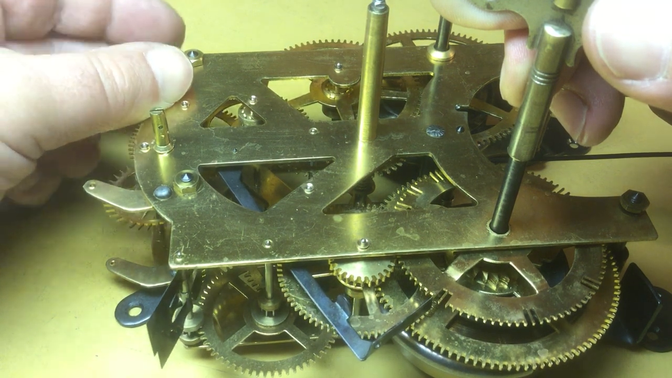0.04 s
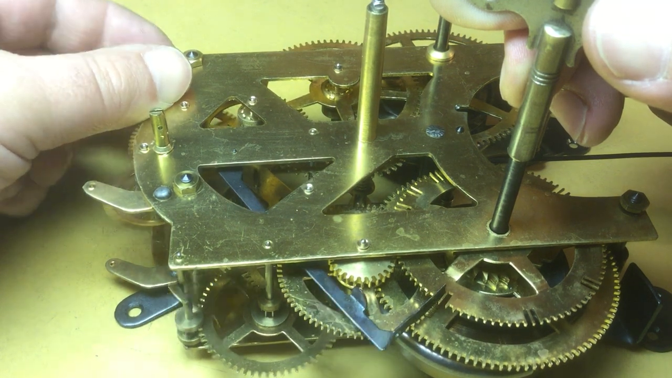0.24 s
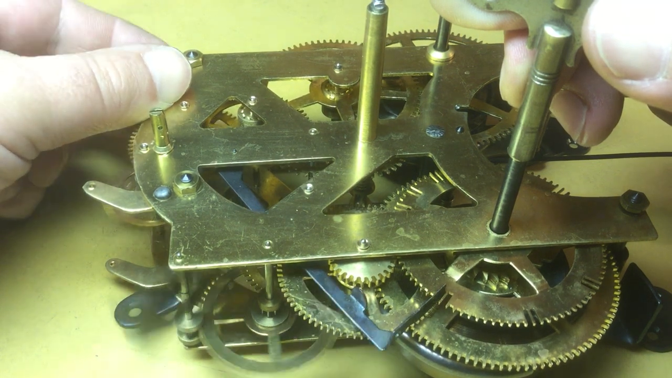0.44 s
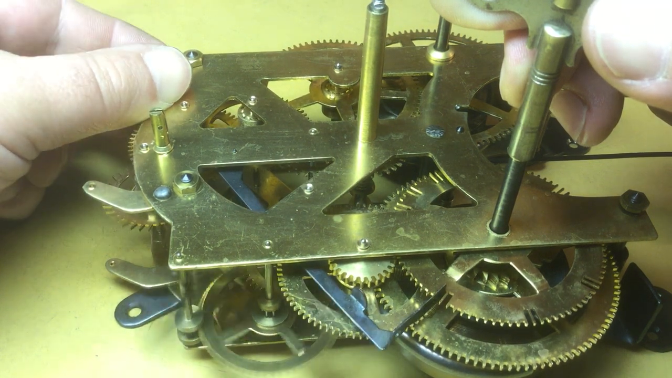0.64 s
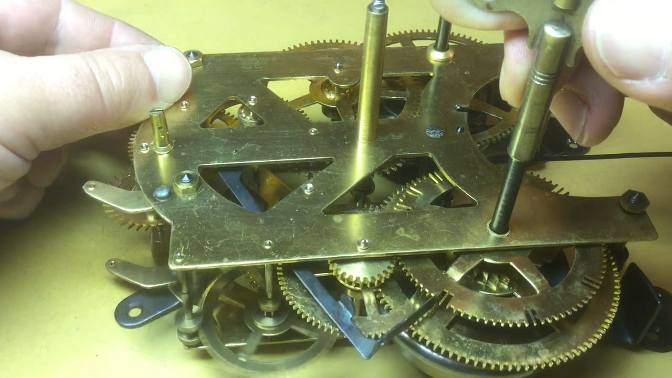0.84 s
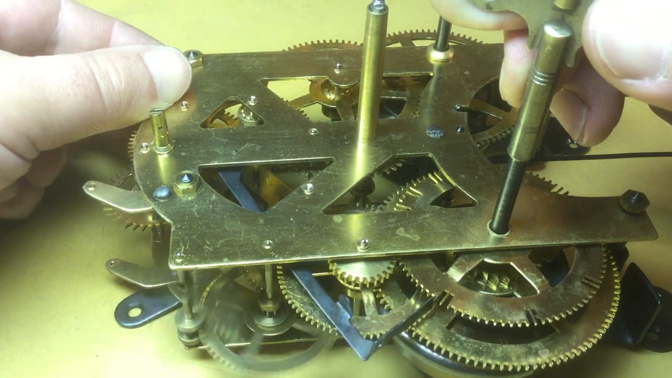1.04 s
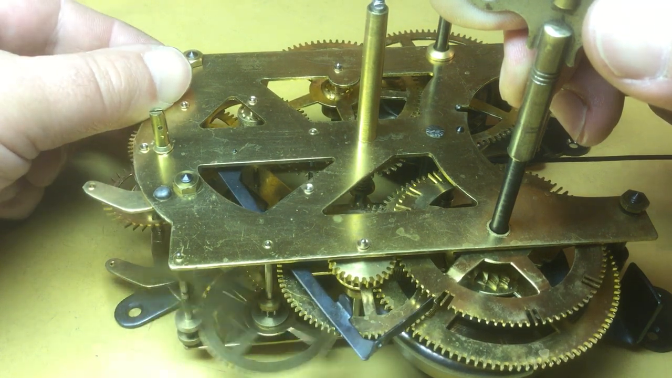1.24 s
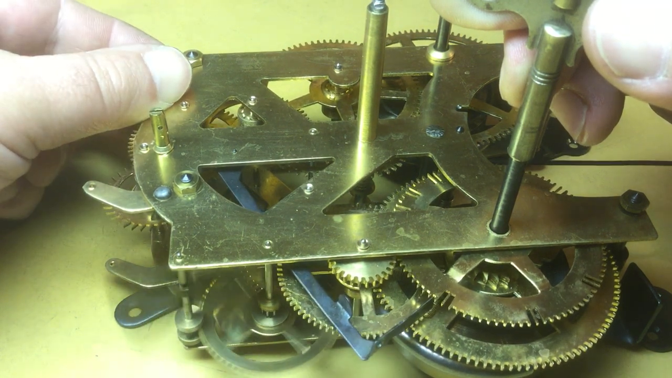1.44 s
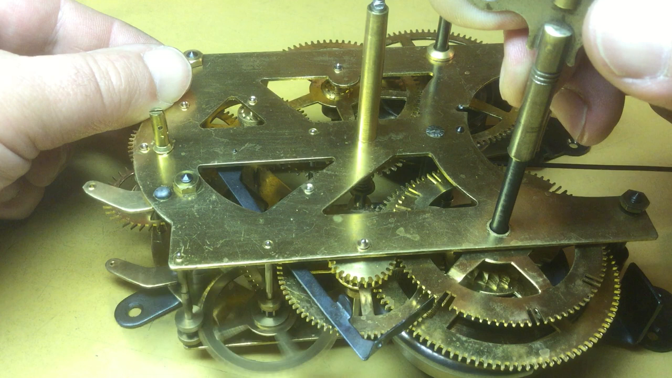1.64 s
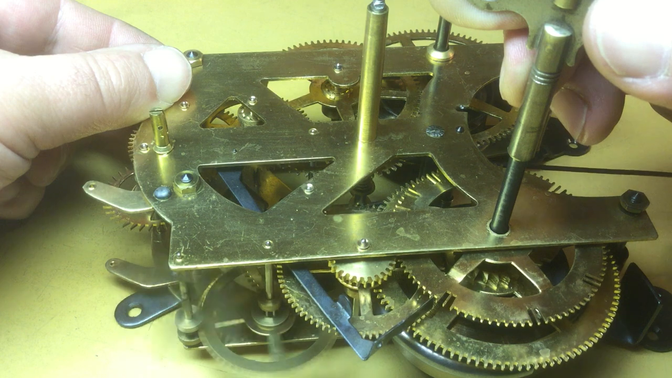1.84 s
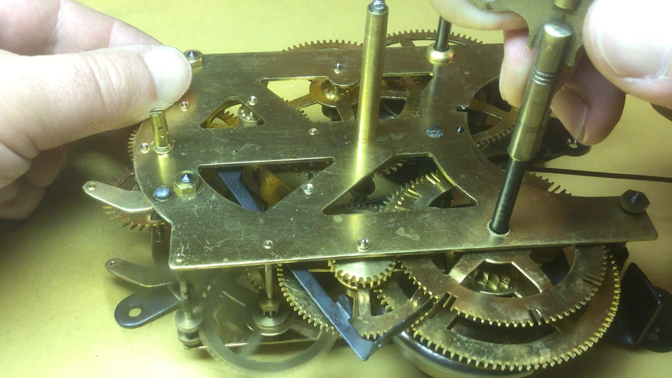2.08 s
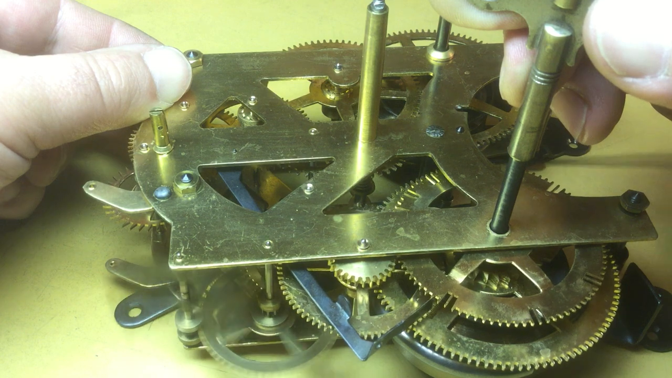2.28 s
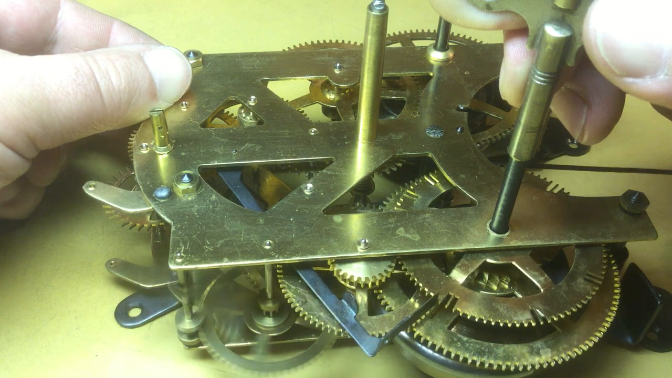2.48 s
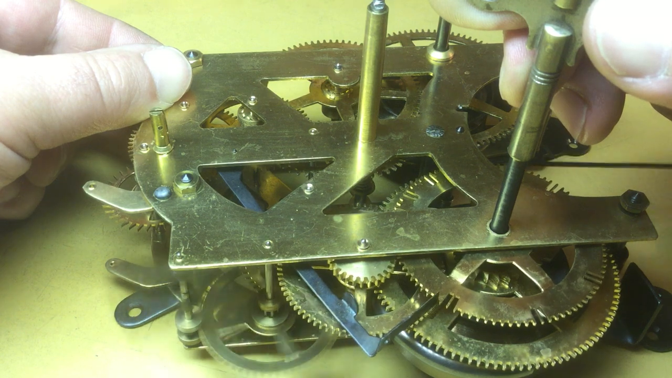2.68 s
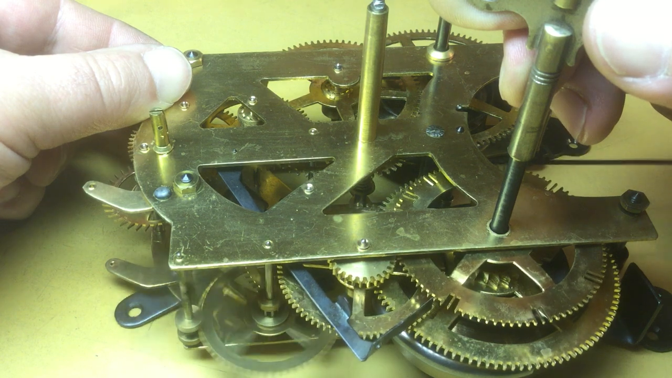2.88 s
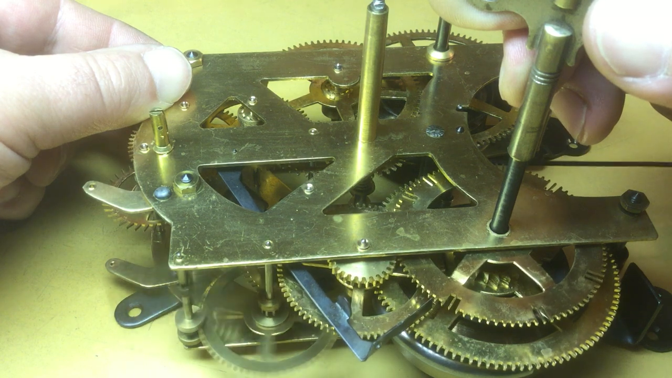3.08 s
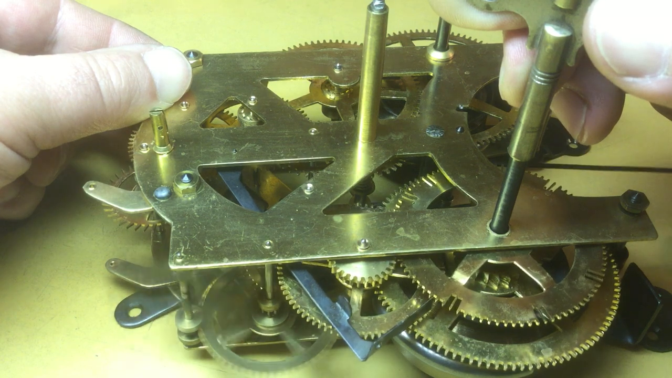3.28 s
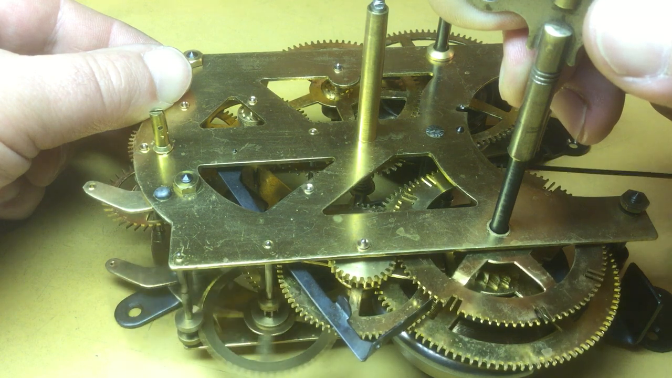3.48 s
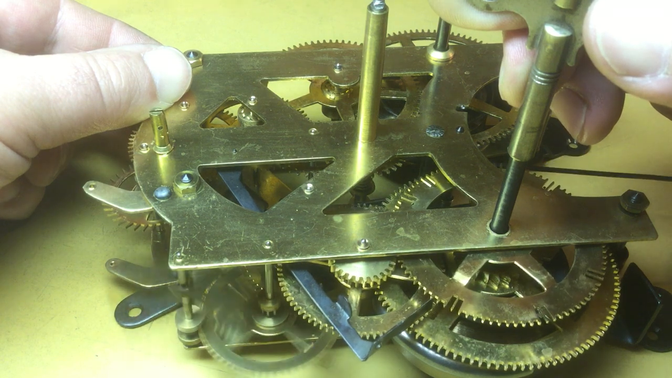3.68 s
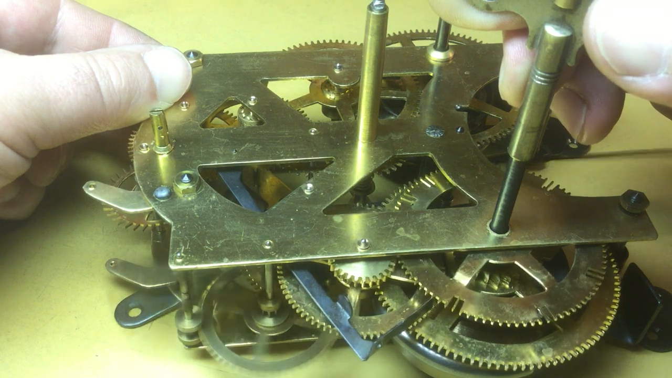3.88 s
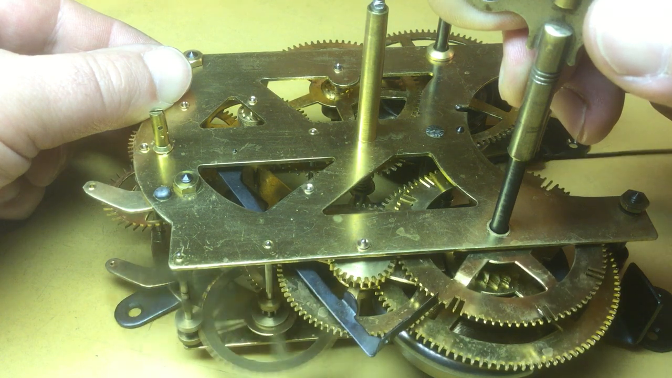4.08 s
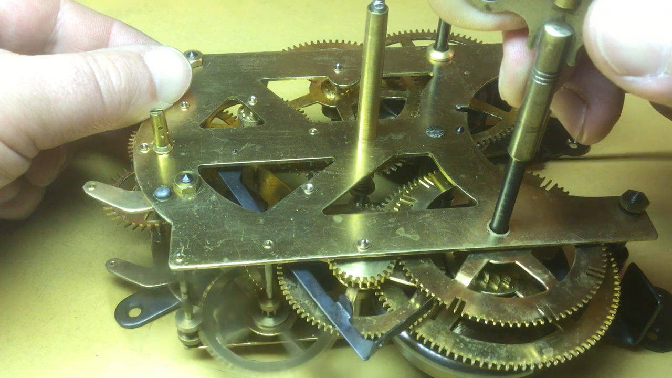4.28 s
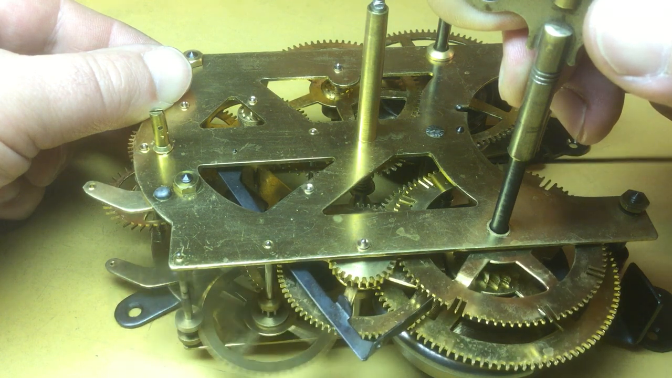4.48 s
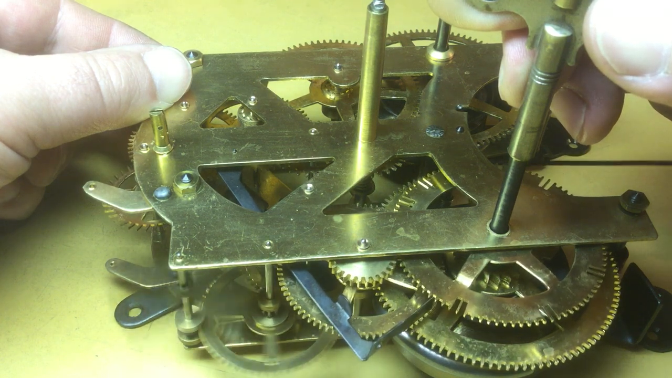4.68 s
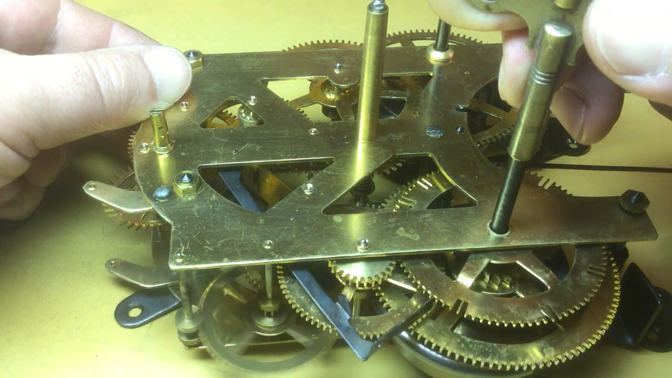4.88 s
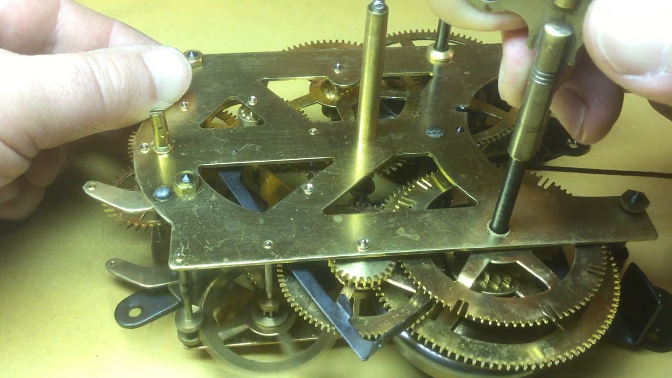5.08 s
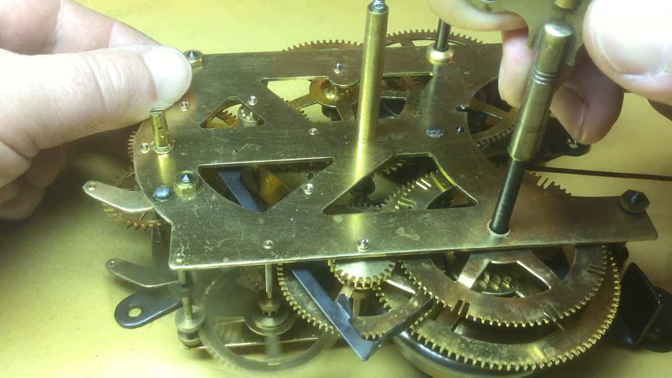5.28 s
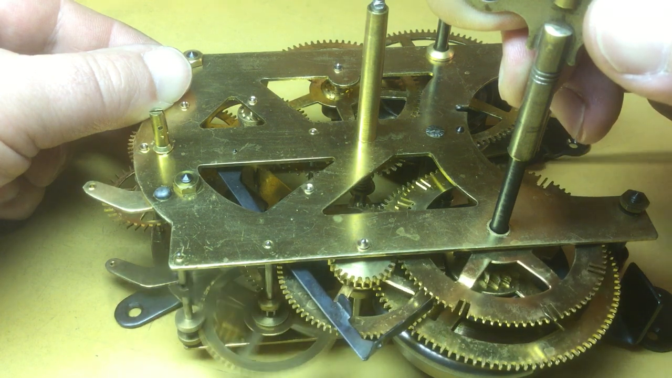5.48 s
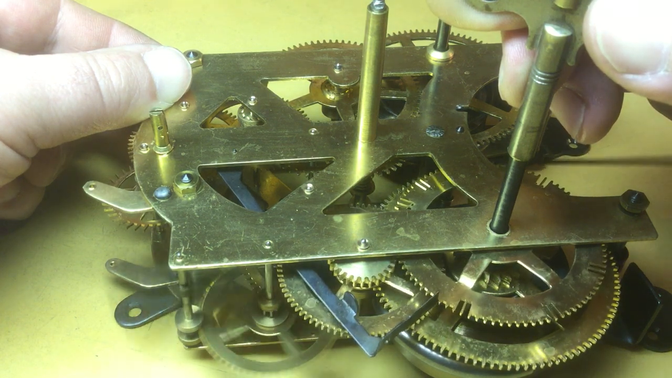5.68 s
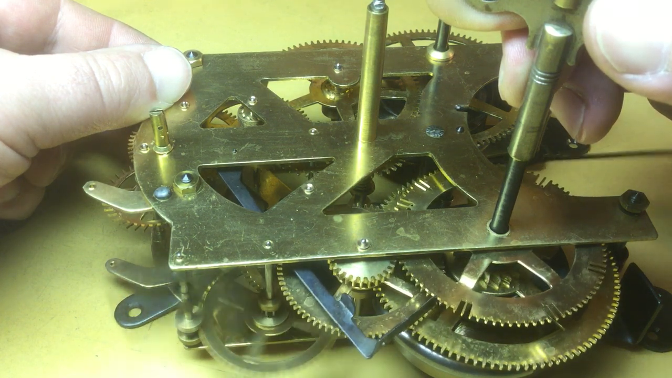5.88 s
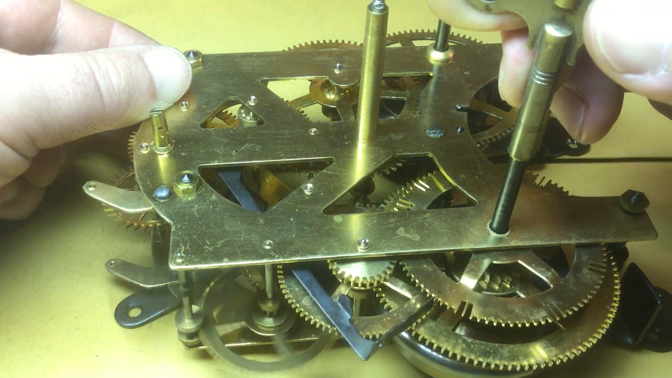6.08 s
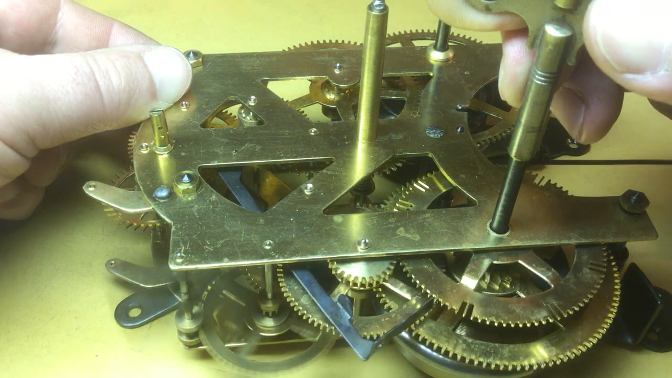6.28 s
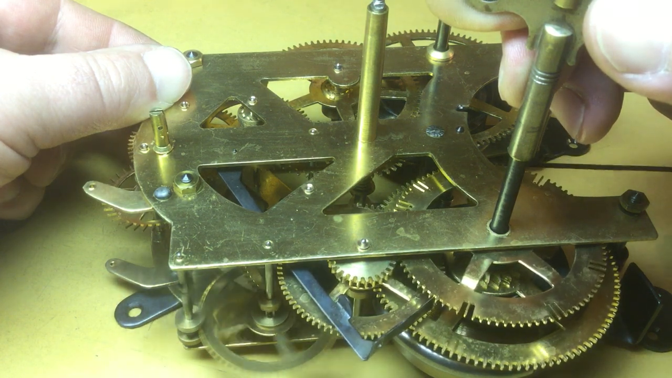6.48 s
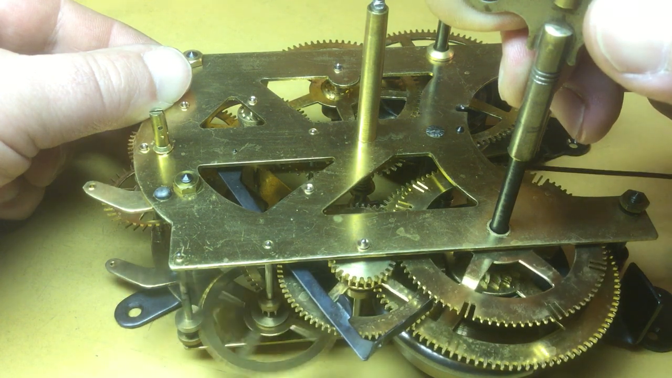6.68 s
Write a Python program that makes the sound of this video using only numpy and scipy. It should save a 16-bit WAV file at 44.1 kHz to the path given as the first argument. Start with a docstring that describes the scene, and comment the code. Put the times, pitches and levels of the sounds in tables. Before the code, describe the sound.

A bright steel double clink releases a brass clock gear train, which whirs up into a fast, uneven metallic rattle over faint ticking and low fan hum.

```python
"""Workshop bench: a brass clock movement is held and let go with a bright double clink of its stop lever.
Its gear train runs free: teeth rattle on the pinions and ring the plates (noise strikes through resonances),
single knocks stand out, pivots rub (grainy noise), bench boards murmur (low noise growing with speed).
Further off, three pendulum clocks tick at their own paces (noise puffs) and a machine, probably a fan,
drones low (coloured noise plus wavering tones)."""
import sys
import numpy as np
from scipy import signal
from scipy.fft import rfft, irfft, next_fast_len
from scipy.io import wavfile
from scipy.ndimage import uniform_filter1d

SR = 44100
rng = np.random.default_rng(int(sys.argv[2]) if len(sys.argv) > 2 else 0)


def pcm_store(signal):
    """Save signal as 16-bit PCM."""
    levels = np.round(np.clip(np.atleast_2d(signal), -1, 1) * 32767)
    wavfile.write(sys.argv[1], SR, levels.astype(np.int16).T)


N = 296793
TIME = np.arange(N) / SR

# train speed [t/s, speed/nominal full speed]
SPEED = [(0, 0.028), (.45, 0.045), (.56, 0.32), (.85, 0.66), (1.4, 0.65), (2.3, 0.9), (4.5, 1.1),
         (5.1, 0.89), (6.2, 1.133), (6.73, 0.8)]
# drive on the train, heard as rattle level [t/s, level/dB]
DRIVE = [(.55, -54), (.66, -57), (.71, -71), (.8, -55), (1.03, -53), (1.15, -49.5), (1.5, -47), (1.8, -50),
         (2.12, -47.5), (2.3, -42.5), (2.5, -44), (2.8, -41.5), (2.96, -43.5), (3.17, -42), (3.6, -46.5),
         (3.98, -41), (4.22, -45), (4.5, -39), (4.75, -45.5), (5.13, -50.5), (5.25, -42), (5.4, -46.5),
         (5.85, -44.5), (5.96, -41.5), (6.2, -42.5), (6.54, -43), (6.66, -50.5)]
# meshing wheels [rate/teeth per s at full speed, relative level/dB, timing slop/teeth, force spread/dB,
# gain from rest to full speed/dB]
MESHES = [(49.53, 0.5, .08, 4, 7), (88.13, 0.5, .15, 5, 20), (268.7, -3.5, .18, 3.5, 22)]
# single blows of the wheels: the rows from 0.52 to 0.77 s are the slow wheel's separate tooth ticks as the
# train starts, the others wheels jumping across their backlash [t/s, level/dB, treble tilt/dB per octave, held
# within +-5 in use]
KNOCKS = [(0.177, -30.5, 2.5), (0.414, -29, 3.5), (0.5243, -36.5, 2), (0.554, -39, -4),
          (0.5862, -27.5, -4.5), (0.603, -39, -4), (0.624, -38.5, -2), (0.643, -46, -7), (0.66, -39, -8),
          (0.677, -54, -3), (0.7305, -29.5, -3), (0.7672, -27, -0.5), (0.784, -22.5, 1),
          (0.7905, -21.5, -5), (0.811, -30, -9), (0.8493, -29.5, -4), (0.866, -32, -3), (0.885, -35, -5),
          (0.921, -36, -3), (0.943, -34, -6), (0.969, -32, -6), (0.9818, -28, -3), (1.0667, -27.5, -3),
          (1.079, -30, -5), (1.1982, -33, 0), (1.231, -29, -5), (1.2393, -31.5, -5), (1.258, -40, -7),
          (1.336, -30, -2), (1.343, -27, 1), (1.349, -28, 0), (1.382, -33, -2), (1.411, -28.5, 1),
          (1.43, -31, 2), (1.4977, -25.5, -1.5), (1.504, -28, -4), (1.5334, -26.5, -3.5), (1.5643, -31, -2),
          (1.575, -26, 2), (1.611, -29.5, -4), (1.725, -29, -2), (1.7344, -33, -8), (1.7767, -33, -3),
          (1.8825, -35, -1), (1.919, -28, -5.5), (2.0003, -31, -3), (2.0268, -28, -3), (2.145, -24, -1),
          (2.165, -26, -2), (2.2086, -26.5, -1), (2.282, -21.5, -1), (2.3014, -23, 0), (2.3231, -27, 1),
          (2.4093, -30, -3), (2.4958, -29, 2), (2.558, -13.5, 2), (2.5888, -24, 5), (2.64, -22.5, -2),
          (2.6527, -25.5, 4), (2.6928, -25.5, -2), (2.7781, -26, 4), (2.849, -20, -0.5), (2.886, -18.5, 3),
          (2.904, -21, -1), (3.015, -23.5, -4.5), (3.0277, -15.5, -1), (3.099, -21, -2), (3.106, -25, -3),
          (3.138, -26, -4), (3.161, -23, -3), (3.17, -24.5, -4), (3.1771, -25, -4), (3.2229, -23, 3),
          (3.263, -24, 5), (3.2911, -28, 7), (3.4729, -21.5, -2), (3.4847, -22.5, 6), (3.5306, -25, -0.5),
          (3.567, -25, 4), (3.662, -27.5, 1), (3.6914, -25.5, -2), (3.812, -24.5, 7), (3.8857, -24, 0),
          (3.9225, -22, 4), (3.9495, -23, 5), (3.9947, -27, 3), (4.0064, -22, 4), (4.03, -22.5, 2),
          (4.0822, -14, 2), (4.18, -21, 4), (4.2, -22.5, -1), (4.2363, -25, 1), (4.28, -24.5, 2),
          (4.353, -24.5, 4), (4.3985, -21.5, -3), (4.4524, -21.5, 1), (4.501, -22, 0),
          (4.6164, -21.5, -3.5), (4.622, -18, 3), (4.6787, -19.5, -6), (4.7447, -24, -2.5),
          (4.8107, -30, 0), (4.868, -28, 6), (4.897, -22, -2.5), (4.9337, -32, 4), (4.946, -27, -2),
          (4.9988, -34, -3), (5.0946, -28.5, -3), (5.189, -27.5, 3), (5.2614, -26.5, 2), (5.302, -23.5, -5),
          (5.473, -23, 4), (5.4852, -22.5, 6), (5.525, -28, 3), (5.6838, -13.5, 2), (5.7457, -33, 1),
          (5.7766, -26, 3), (5.9223, -22, 2), (5.9656, -24.5, -2), (6.0094, -25, 6), (6.0935, -27, 1),
          (6.1694, -21.5, -2), (6.227, -23, -1), (6.2409, -16.3, -2), (6.2851, -21.5, -1),
          (6.3023, -21, -4), (6.4632, -24.5, -3.5), (6.525, -29, -2), (6.5609, -23.5, 0), (6.6966, -30, -1)]
# steel stop lever slips off and strikes the frame [t/s, level/dB]
CLINKS = [(0.277, -28), (0.2805, -11), (0.292, -15), (0.2968, -17), (0.299, -14.5), (0.3025, -23)]
# plate and wheel resonances [f/Hz, width/Hz, relative level/dB]
BRASS_MODES = [(2270, 160, -16), (2920, 110, -7.5), (3070, 70, -8.5), (3335, 150, -4.5), (3520, 120, -13),
               (3990, 190, -1.5), (4150, 100, -9), (4370, 130, -4), (5230, 170, 1.5), (5370, 120, 0),
               (5626, 70, -7.5), (5900, 150, -2), (6060, 170, -1), (6270, 130, -4), (6500, 90, -4),
               (6620, 110, -4), (6800, 130, -3), (7120, 80, -5.5), (7560, 170, -6), (7900, 250, -10),
               (8100, 110, -2.5), (8640, 140, -2.5), (8870, 100, -5), (9500, 220, -7), (9720, 140, -4),
               (10130, 110, -4), (10335, 190, -3), (11100, 180, -3.5), (11400, 250, -9.5), (13570, 150, -7),
               (14000, 90, -9), (14820, 300, -8.5), (15240, 120, -9.5), (15560, 300, -8)]
# dense modes between them [f/Hz, relative level/dB]
PLATE_SPECTRUM = [(30, -82), (200, -32.5), (500, -16), (900, -19.5), (1400, -16.5), (2300, -20.5),
                  (2500, -18), (2780, -28), (3050, -12.5), (4700, -9.5), (6000, -2), (7700, -8.5),
                  (10500, -4), (12400, -5.5), (15500, -13)]
# long-ringing modes of the movement [f/Hz, relative level/dB, t60/s]
RING_MODES = [(2230, -16, .09), (2870, -6, .045), (3070, -15, .07), (4224, -18, .13), (4900, -16, .07),
              (5090, -14, .07), (5286, -9, .095), (5690, -11, .09), (5841, -15, .11), (6191, -13, .11),
              (6499, -9, .07), (6925, -5.5, .085), (7590, -16, .08), (7850, -16, .07), (8269, -12, .1),
              (8530, -13, .06), (8845, -12, .08), (9324, -16, .09), (9730, -12, .08), (10135, -10, .08),
              (10780, -18, .09), (11880, -9, .09), (13010, -20, .1), (13580, -23, .22), (13760, -17, .1),
              (13980, -15, .1), (14340, -24, .24), (15010, -18, .13), (15240, -9, .1), (15620, -12, .08)]
# pivot rub spectrum [f/Hz, relative level/dB]
RUB_SPECTRUM = [(30, -41), (200, -44), (550, -4), (850, -12.5), (1250, 3.5), (1800, -1), (2350, 2.5),
                (2500, -19), (2780, -69), (3200, 0.5), (5500, -0.5), (9000, -24), (16000, -37)]
# bench board murmur spectrum [f/Hz, relative level/dB]
BENCH_SPECTRUM = [(20, -48), (100, -25), (190, 2), (320, 6), (440, -1.5), (520, -19), (620, -8.5),
                  (900, -27), (3000, -61), (16000, -74)]
# pendulum clocks [full swing/s, first tick t/s, first tock t/s, tick level/dB, tock level/dB,
# tick f/Hz, tock f/Hz, brightness/dB per octave]
CLOCKS = [(0.9002, 0.072, .514, -54.5, -52.5, 1510, 2050, 2),
          (0.9994, 0.42, .912, -57.5, -54, 2530, 1430, 6), (1.327, 0.456, 1.095, -54.5, -53, 2380, 1910, 0)]
# beat spectrum [f/Hz, relative level/dB]
BEAT_SPECTRUM = [(30, -45), (250, -26), (550, 6.5), (850, 2), (1250, 5), (1800, 3.5), (2350, 1.5),
                 (2750, -7), (3300, -6), (5000, -14.5), (9000, -29), (16000, -41)]
# faint steel ring at each tick of the first clock [delay/s, f/Hz, level/dB, t60/s]
PALLET_RINGS = [(.01, 12360, -58, 0.16), (.019, 5520, -64.5, 0.14)]
# fan air noise spectrum [f/Hz, relative level/dB]
FAN_SPECTRUM = [(20, -56), (60, -40), (100, -23), (140, 0), (160, -3.5), (185, 0.5), (218, -4.5),
                (255, 2.5), (320, -3), (370, -14.5), (520, -25), (900, -31.5), (1350, -26.5), (2000, -36.5),
                (2700, -42), (3300, -48), (7000, -49), (10000, -54), (16000, -59)]
# fan tones [f/Hz, rms level/dB, waver depth/ratio]
FAN_TONES = [(119.8, -54.5, 0.21), (181, -57, 0.63), (244.6, -54.5, 1.3), (251.9, -52.5, 1.4),
             (276.7, -59, 1.4), (308, -61, 1.3), (362, -84, 0.9)]

# treble of a contact dies sooner than its body
TREBLE_HZ, TREBLE_T60_SHARE = 7940, 0.79
# how strongly tooth body and treble snap follow force, dB per dB
BODY_FORCE_SHARE, SNAP_FORCE_SHARE = .75, 1.2
# tooth ping: level re its click
PING_DB, PING_T60_S = -5.5, 0.052
# knock t60 at the reference level, and dB that double it
KNOCK_T60_S, KNOCK_REFERENCE_DB, KNOCK_DOUBLING_DB = 0.034, -28, 38
# blows shake the brass little below these
KNOCK_LOW_HZ, LEVER_LOW_HZ = 1500, 1500
# knocks above this also ring the long modes
RING_FROM_DB = -21
# lever edge tone, and the ring after the last strike
EDGE_START_S, EDGE_LENGTH_S, EDGE_HZ = .2815, .016, 11100
EDGE_DB, LEVER_RING_DB = -23.5, -28.5
# rub level at the usual drive, and dB per dB of drive
RUB_DB, USUAL_DRIVE_DB, RUB_DB_PER_DB = -56.5, -43, 0.79
# room smears each beat into a short puff
BEAT_RISE_S, BEAT_T60_S, BEAT_VARY_DB = 0.0076, 0.21, 0.7
# clock case resonance, level re the beat noise
CASE_WIDTH_HZ, CASE_DB = 410, -5.5
CUTOFF_HZ = 15850


def gears():
    """Teeth rattle once the wheels turn; faster meshes gain more with speed, and ticks bunch as wheels rock."""
    slowness = 1 - curve(SPEED)
    teeth = np.zeros(N)
    for rate, db, slop, spread_db, rise_db in MESHES:
        teeth += amp(db - rise_db * slowness) * mesh(rate, slop, spread_db)
    teeth = unit(teeth * amp(1 * wander(rate_hz=25)))
    # even out the level, so that DRIVE sets it
    strength = np.sqrt(np.abs(uniform_filter1d(teeth ** 2, size=5000)) + 0.028)
    # slow teeth land softly
    dull = lowpass(teeth)
    teeth = dull + (teeth - dull) * amp(-7 * slowness)
    return teeth / strength * amp(curve(DRIVE)) * turning()


def mesh(rate, slop, spread_db, count=24):
    """Teeth drop on a pinion early or late, the harder the brighter; count tooth sounds recur in rotation."""
    turns = np.cumsum(np.maximum(curve(SPEED), 0)) * rate / SR
    late, force, side = rng.standard_normal((2500, 3)).T
    at = np.searchsorted(turns, np.arange(len(late)) + 1 + slop * late)
    force_db = spread_db * np.minimum(force, 1.5)
    push = np.sign(side) * unit(amp(BODY_FORCE_SHARE * force_db))
    snap = np.sign(side) * unit(amp(SNAP_FORCE_SHARE * force_db))
    zero_phase = signal.butter(2, TREBLE_HZ, fs=SR)
    out = np.zeros(N)
    for k in range(count):
        tick = strike(t60=0.018, crack_db=6.0, tail_db=-30, tail_t60=0.1, rise_s=0.0012, size=4000)
        tooth = frame(tick, modes_db=5.0, vary_db=2.5, tilt_db=1.3 * rng.standard_normal())
        tooth += amp(PING_DB) * tooth.std() * ping(len(tooth))
        body = signal.filtfilt(*zero_phase, tooth)
        treble = tooth - body
        for sample, low, high in zip(at[k::count], push[k::count], snap[k::count]):
            add(out, sample / SR, low * body + high * treble)
    return out


def turning():
    """Gate: 0 while the wheels stand or creep, 1 once they run."""
    return np.clip((curve(SPEED) - .1) / .35, 0, 1)


def knocks():
    """Single harder blows of the wheels; the heavier, the longer they decay."""
    out = np.zeros(N)
    thin = signal.butter(1, KNOCK_LOW_HZ, "high", fs=SR)
    for s, db, tilt_db in KNOCKS:
        t60 = KNOCK_T60_S * 2 ** ((db - KNOCK_REFERENCE_DB) / KNOCK_DOUBLING_DB)
        blow = strike(t60, crack_db=4, tail_db=-27, tail_t60=0.17, rise_s=0.0012)
        blow = signal.lfilter(*thin, blow)
        sound = frame(blow, modes_db=1.5, vary_db=2, tilt_db=np.clip(tilt_db, -5, 5))
        if db > RING_FROM_DB:
            sound = sound + amp(-23) * ring()
        add(out, s, amp(db) * sound)
    return out


def lever():
    """The stop lever strikes and chatters, its edge sings briefly; the last strike leaves the movement ringing."""
    out = np.zeros(N)
    thin = signal.butter(1, LEVER_LOW_HZ, "high", fs=SR)
    for s, db in CLINKS:
        blow = strike(t60=0.027, crack_db=4.5, tail_db=-12, tail_t60=0.13, rise_s=0.0005)
        blow = signal.lfilter(*thin, blow)
        add(out, s, amp(db) * frame(blow, modes_db=-8, vary_db=1.5, tilt_db=.4))
    add(out, CLINKS[-1][0], amp(LEVER_RING_DB) * ring())
    t = np.arange(round(EDGE_LENGTH_S * SR)) / SR
    edge = np.sin(2 * np.pi * EDGE_HZ * t) * signal.windows.tukey(len(t), .1)
    add(out, EDGE_START_S, amp(EDGE_DB - 60 * t / 0.074) * edge)
    return out


def strike(t60, crack_db, tail_db, tail_t60, rise_s=.0005, size=10000):
    """One metal contact: a sharp crack, a quick dense ring that dulls as it dies, and a longer tail."""
    t = np.arange(size) / SR
    grain = rng.standard_normal(size)
    body = lowpass(grain)
    dense = body * amp(-60 * t / max(t60, .005))
    dense += (grain - body) * amp(-60 * t / max(t60 * TREBLE_T60_SHARE, .005))
    crack = grain * amp(crack_db - 60 * t / 0.0051)
    tail = grain * amp(tail_db - 60 * t / tail_t60)
    out = (dense + crack + tail) / (1 + amp(crack_db) + amp(tail_db))
    return out * (1 - np.exp(-t / rise_s))


def frame(x, modes_db, vary_db, tilt_db=0, size=4096):
    """Passes blows through the brass frame; each point of contact favours other resonances and registers."""
    hz = np.fft.rfftfreq(size, 1 / SR)
    favour_db = modes_db + vary_db * np.clip(rng.standard_normal(len(BRASS_MODES)), -2, 1.5)
    peaks = np.zeros(len(hz))
    for (f, width, db), extra_db in zip(BRASS_MODES, favour_db):
        peaks += amp(db + extra_db) ** 2 / (1 + (2 * (hz - f) / width) ** 2) ** 2
    # a blow misses waves with a node under it: broad dips along the spectrum
    nodes_db = vary_db * np.cos(2 * np.pi * (hz / rng.uniform(3200, 13600) + rng.random()))
    slope_db = tilt_db * np.log2(hz / 7000 + 0.04)
    gain = np.sqrt(colour(PLATE_SPECTRUM, hz) ** 2 + peaks) * amp(nodes_db + slope_db)
    # minimum phase: a causal ring
    log_gain = np.log(unit(gain))
    circle = np.concatenate([log_gain, log_gain[-2:0:-1]])
    response = np.fft.ifft(np.exp(np.conj(signal.hilbert(circle)))).real
    return signal.oaconvolve(x, response)[:len(x)]


def ping(size, count=4):
    """A short metallic ring of rms 1: a few resonances, each a little off its centre, the higher the shorter."""
    t = np.arange(size) / SR
    modes = np.array(BRASS_MODES)[rng.integers(len(BRASS_MODES), size=count)]
    tones = np.zeros(size)
    for hz, width, db in modes:
        detuned_hz = hz + width * rng.uniform(-0.48, 0.51)
        decay = amp(-60 * t / PING_T60_S * np.sqrt(hz / TREBLE_HZ))
        tones += amp(db) * np.sin(2 * np.pi * (detuned_hz * t + rng.random())) * decay
    return unit(tones * (1 - np.exp(-t / 0.0011)))


def ring(size=10000):
    """The long modes after one blow: decaying sines, each of its own strength and phase."""
    t = np.arange(size) / SR
    out = np.zeros(size)
    for hz, db, t60 in RING_MODES:
        tone = np.sin(2 * np.pi * (hz * t + rng.random()))
        out += rng.uniform(1.1, 1.9) * amp(db - 60 * t / t60) * tone
    return out


def pivots():
    """A grainy rub that follows the drive while the wheels turn."""
    level_db = RUB_DB + RUB_DB_PER_DB * (curve(DRIVE) - USUAL_DRIVE_DB)
    grit = unit(amp(2.8 * wander(rate_hz=72)))
    return noise(RUB_SPECTRUM) * grit * amp(level_db) * turning()


def bench():
    """The boards take up the shaking of the wheels, amplitude growing with the square of speed."""
    return noise(BENCH_SPECTRUM) * amp(-54) * curve(SPEED) ** 2


def clocks():
    """Each distant clock ticks and tocks once a swing, on two notes of its case; the first also rings faintly."""
    out = np.zeros(N)
    for swing_s, tick_s, tock_s, tick_db, tock_db, tick_hz, tock_hz, tilt_db in CLOCKS:
        voice = noise([(hz, db + tilt_db * np.log2(hz / 2000)) for hz, db in BEAT_SPECTRUM])
        grit = unit(amp(2.5 * wander(rate_hz=160)))
        for first_s, db, hz in (tick_s, tick_db, tick_hz), (tock_s, tock_db, tock_hz):
            note = unit(voice + amp(CASE_DB) * band(hz, CASE_WIDTH_HZ))
            out += amp(db) * note * grit * beats(first_s, swing_s, BEAT_T60_S)
    swing_s, tick_s = CLOCKS[0][:2]
    for delay_s, hz, db, t60 in PALLET_RINGS:
        out += amp(db) * band(hz, width_hz=240) * beats(tick_s + delay_s, swing_s, t60)
    return out


def beats(first_s, every_s, t60):
    """Envelope of an evenly repeated beat: soft rise, exponential decay, slightly varied level."""
    out, t = np.zeros(N), np.arange(SR // 2) / SR
    shape = (1 - np.exp(-t / BEAT_RISE_S)) * amp(-60 * t / t60)
    shape /= shape.max()
    for s, chance in zip(np.arange(first_s, TIME[-1], every_s), rng.standard_normal(size=16)):
        add(out, s, amp(BEAT_VARY_DB * chance) * shape)
    return out


def fan():
    """Low air noise with hum tones whose amplitude and phase waver."""
    out = amp(-46.5) * noise(FAN_SPECTRUM)
    for hz, db, waver in FAN_TONES:
        sway = 1 + waver * (wander(rate_hz=4.9) + 1j * wander(rate_hz=4.7))
        out += amp(db) * unit((sway * np.exp(2j * np.pi * hz * TIME)).real)
    return out


def amp(db):
    """Decibels to gain."""
    return 10 ** (np.asarray(db) / 20)


def unit(x):
    """Scales to rms 1."""
    return x / np.sqrt(np.mean(x ** 2) + 1e-20)


def curve(rows):
    """Joins (t/s, value) rows by straight lines."""
    return np.interp(TIME, *np.transpose(rows))


def colour(points, hz):
    """Gain of a (f/Hz, level/dB) spectrum on a log-frequency axis."""
    f, db = np.transpose(points)
    return amp(np.interp(np.log(hz + 1), np.log(f + 1), db))


def noise(points):
    """Noise of rms 1 with the given spectrum."""
    size = next_fast_len(N, True)
    gain = colour(points, np.fft.rfftfreq(size, 1 / SR))
    return unit(irfft(rfft(rng.standard_normal(size)) * gain, size)[:N])


def band(hz, width_hz):
    """Noise of rms 1 in one resonance."""
    sos = signal.butter(2, [hz - width_hz / 2, hz + width_hz / 2], "band", fs=SR, output="sos")
    return unit(signal.sosfilt(sos, rng.standard_normal(N)))


def lowpass(x):
    """First-order split: the part below the treble."""
    return signal.lfilter(*signal.butter(1, TREBLE_HZ, fs=SR), x)


def wander(rate_hz, size=8192):
    """Random drift of rms 1: noise under a Gaussian low-pass."""
    hz = np.fft.rfftfreq(size, TIME[-1] / size)
    slow = irfft(rfft(rng.standard_normal(size)) * np.exp(-(hz / rate_hz) ** 2))
    return unit(np.interp(TIME, np.linspace(0, TIME[-1], size), slow))


def add(mix, s, sound):
    """Mixes a sound in at time s."""
    part = mix[max(round(s * SR), 0):][:len(sound)]
    part += sound[:len(part)]


def scene():
    """The movement close by, the clocks and the fan behind."""
    movement = gears() + knocks() + lever() + pivots() + bench()
    return (movement + clocks() + fan())[None]


def record(dry):
    """The recorder's upper band limit; the sound eases in and out over a few milliseconds."""
    eased = dry * signal.windows.tukey(N, .002)
    lowpass_fir = signal.firwin(511, CUTOFF_HZ, window=("kaiser", 9), fs=SR)
    return signal.oaconvolve(eased, lowpass_fir[None], "same")


dry = scene()
out = record(dry)
pcm_store(out)
```